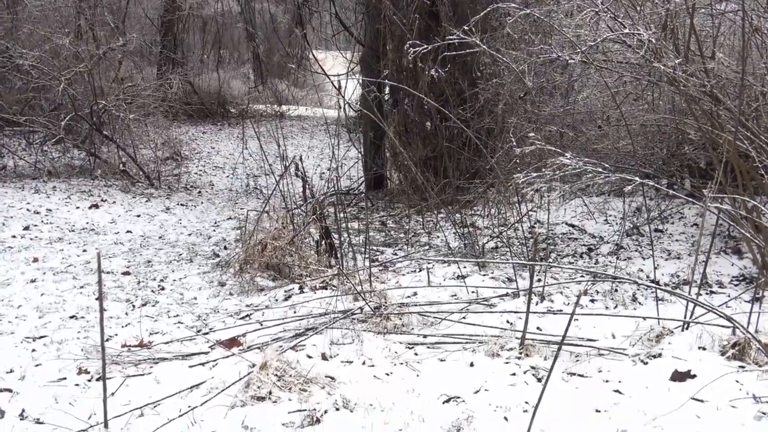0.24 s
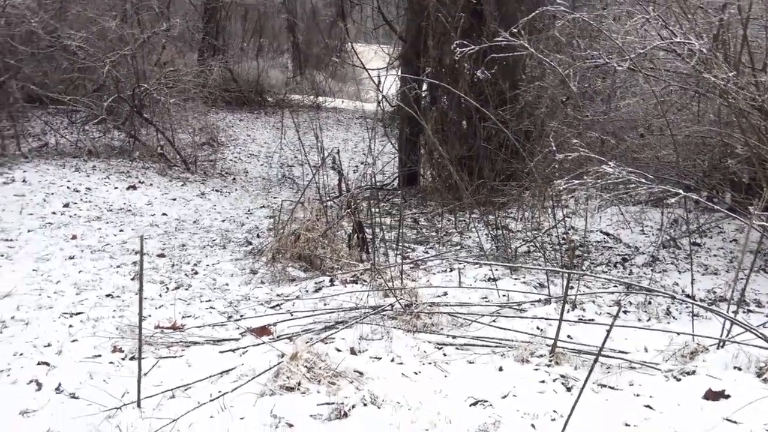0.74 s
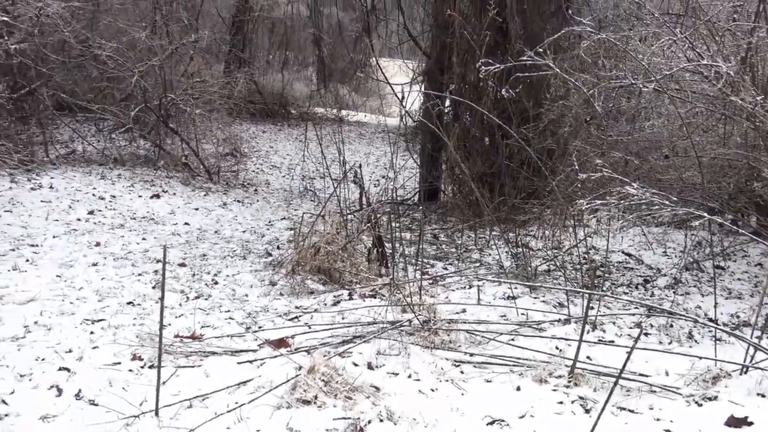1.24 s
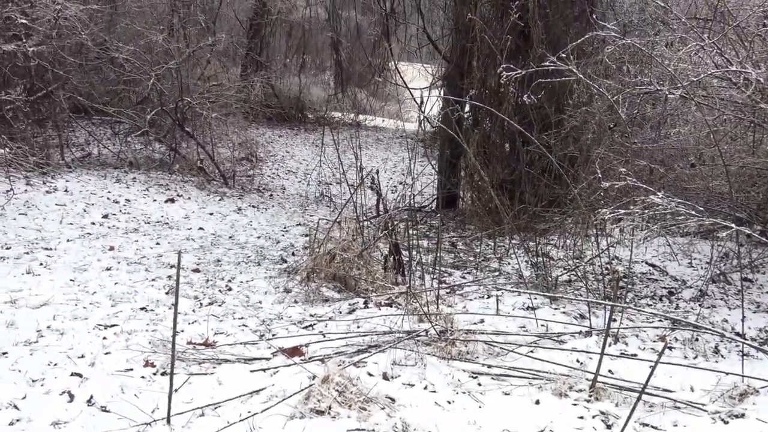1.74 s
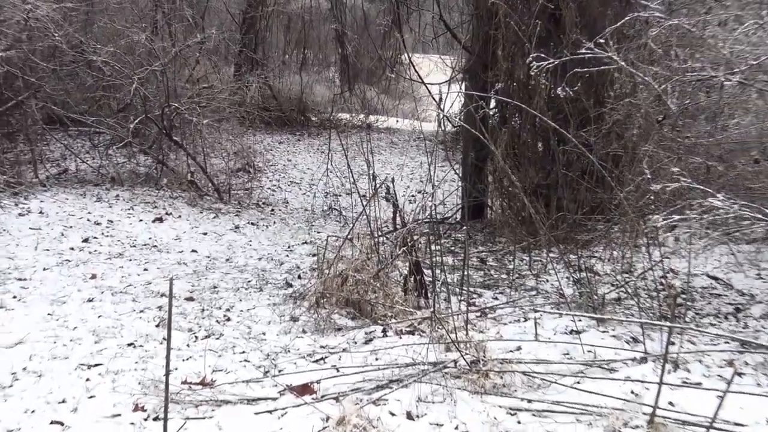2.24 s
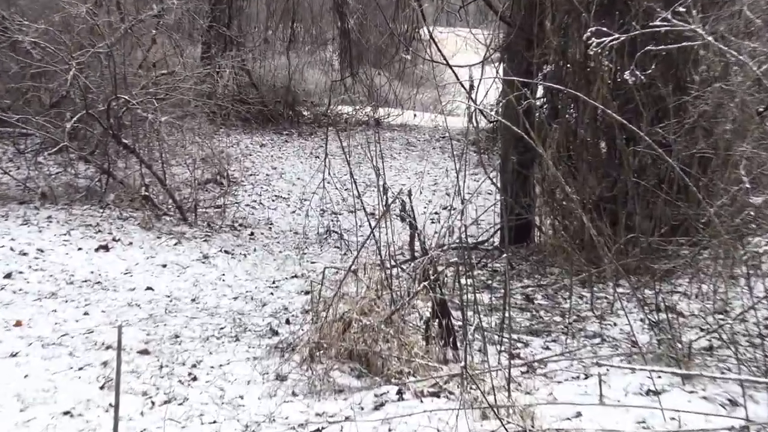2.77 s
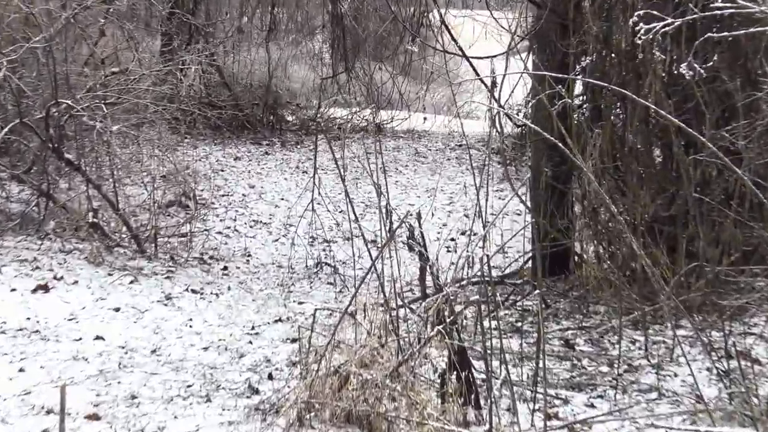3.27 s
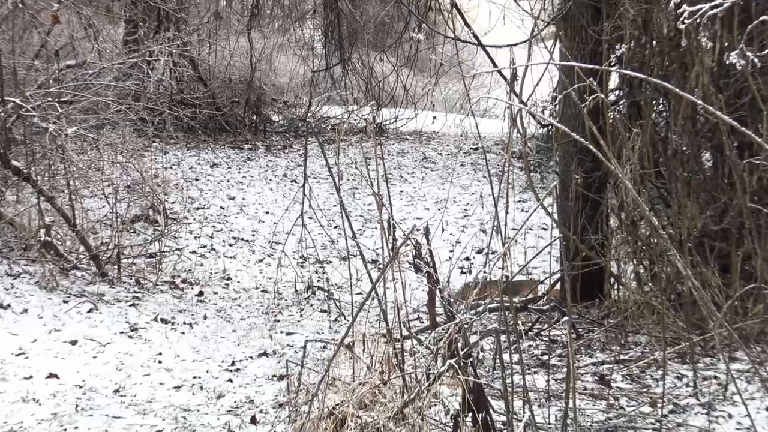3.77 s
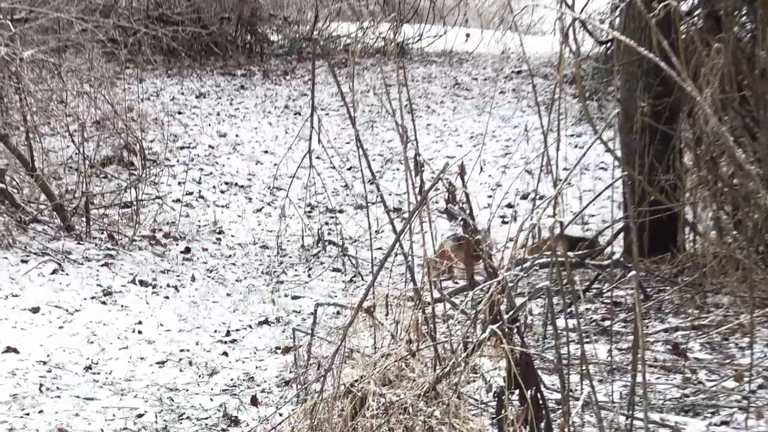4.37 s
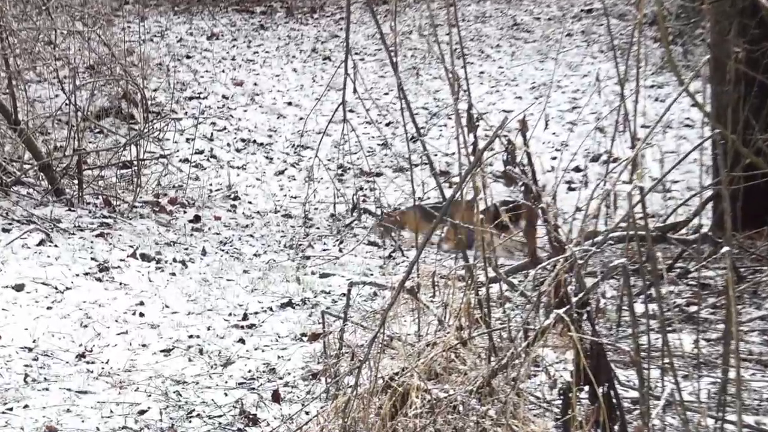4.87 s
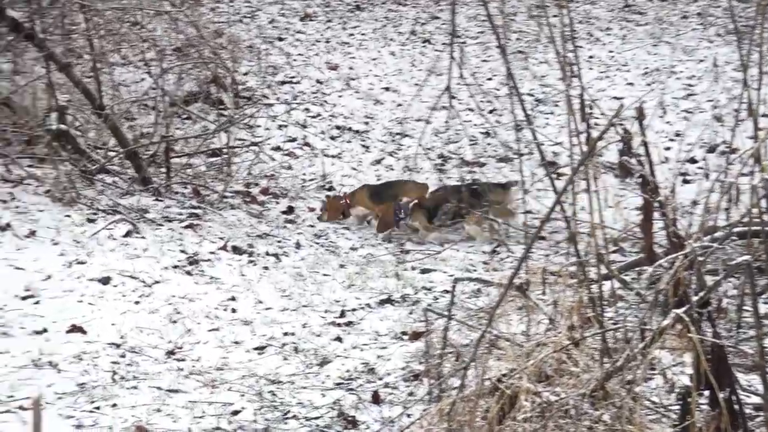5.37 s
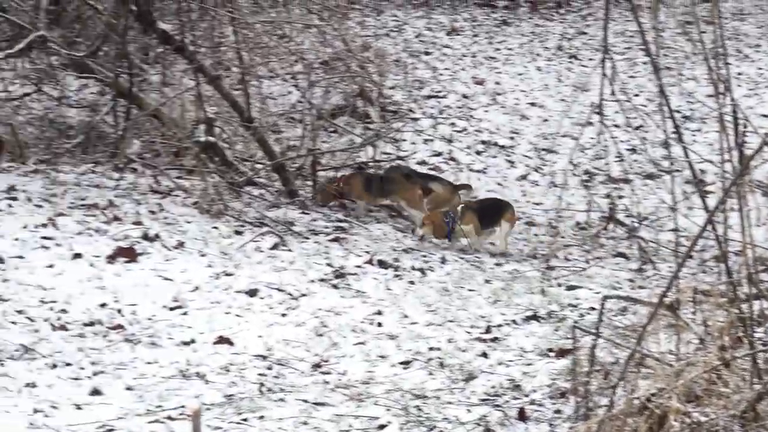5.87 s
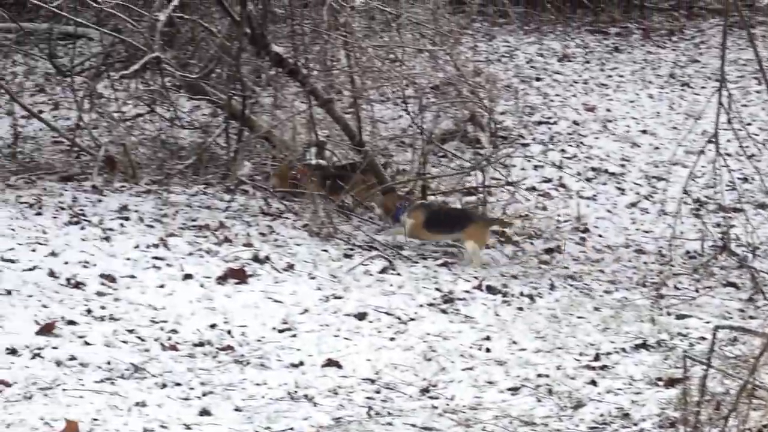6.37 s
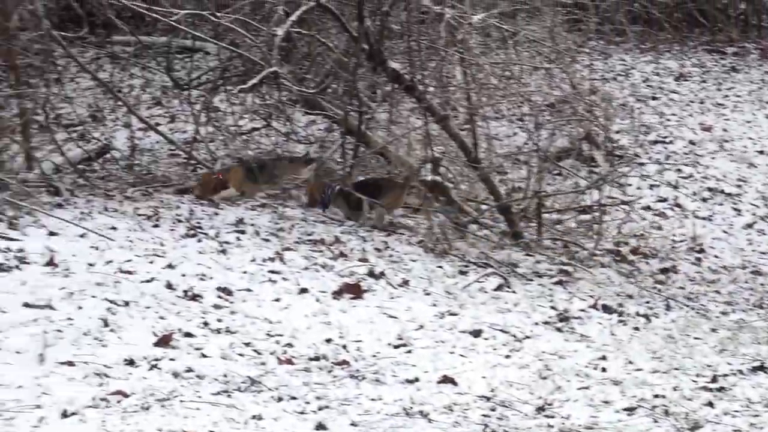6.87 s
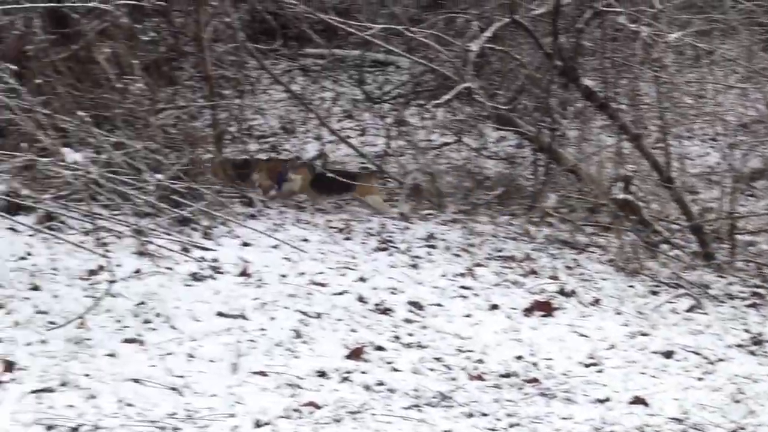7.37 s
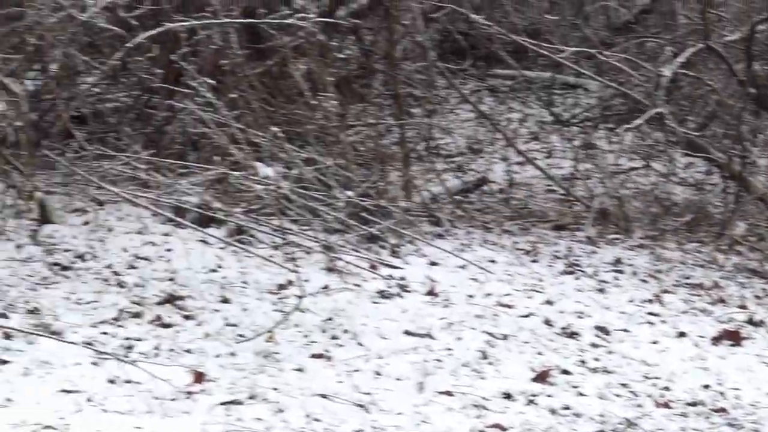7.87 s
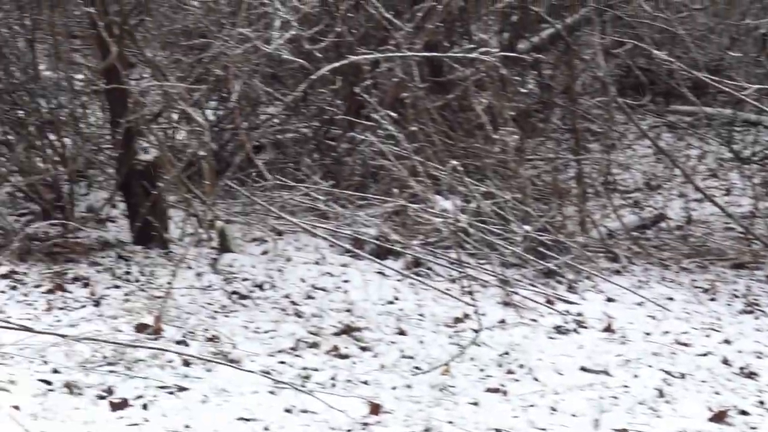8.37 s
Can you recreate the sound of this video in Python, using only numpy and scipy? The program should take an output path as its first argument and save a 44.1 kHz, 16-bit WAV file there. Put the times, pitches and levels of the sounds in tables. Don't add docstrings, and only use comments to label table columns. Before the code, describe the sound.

A pack of three hounds is baying from the first instant and keeps going to the end, about 8.6 seconds, over a low steady hum of far traffic and air. Cries last roughly 0.1 to 0.25 seconds and overlap: clear held notes, slides falling from brief squeaks, and thin yips cracking into hoarse lower bays. Dry twigs tick close by within the first 0.6 seconds, while a faint rising whine sounds farther off at 0.5. A soft paw thud comes near 1.8, a sharp twig snap at 3.4. From about 3.7 the cries gain fine breathy hiss as the dogs cross open ground, with loud bays around 5.2 to 6.2 and soft footfalls at 5, 6.2, 7.6 and 8.1. They are brightest near 7.2, then dull among trees, still crying. Short trunk echoes follow throughout; the dogs stay slightly right.

```python
import sys
import numpy as np
from scipy import signal
from scipy.fft import rfft, irfft, next_fast_len
from scipy.io import wavfile
from scipy.ndimage import uniform_filter1d, minimum_filter1d, map_coordinates

SR = 44100
rng = np.random.default_rng(int(sys.argv[2]) if len(sys.argv) > 2 else 0)


def persist_wave(psi):
    counts = np.round(np.clip(psi, -1, 1) * 32767).astype(np.int16)
    wavfile.write(sys.argv[1], SR, np.atleast_2d(counts).T)


def voltage_ratio(level):
    return 10 ** (np.asarray(level, float) / 20)


N = 380583

PEAK_AT = 0.402


def unit(x):
    return x / np.sqrt(np.mean(x ** 2) + 1e-20)


def along(points, hz):
    f, v = np.transpose(points)
    return np.interp(np.log(hz + 1), np.log(f + 1), v)


def wobble(count, rate):
    knots = rng.standard_normal(400)
    return map_coordinates(knots, [np.arange(count) * rate / SR], mode="wrap")


def filtered(x, response):
    m = next_fast_len(x.shape[-1] + 8192)
    hz = np.fft.rfftfreq(m, 1 / SR)
    return irfft(rfft(x, m) * response(hz), m)[..., :x.shape[-1]]


def patchy(channels, depth_db, order, size):
    z = signal.stft(rng.standard_normal((channels, N + SR)), nperseg=1024)[2]
    field = uniform_filter1d(rng.standard_normal(z.shape[1:]), order, 0)
    field = uniform_filter1d(field, size, 1)
    return signal.istft(z * voltage_ratio(depth_db * unit(field)), nperseg=1024)[1][:, :N]


def add(track, s, x):
    i = round(s * SR)
    x = x[max(-i, 0):N - i]
    track[max(i, 0):][:len(x)] += x


def held_cries(rows, bend, swell, rasp):
    third_follows = 0.36
    cries, rasps_db = [], []
    for s, length, hz, db, mouth_db in rows:
        opened_db, closed_db = max(mouth_db, 0), min(mouth_db, 0)
        mouth = [-opened_db, closed_db, third_follows * closed_db]
        cries.append([(s + u * length, hz * ratio, *(db + np.add(partials, mouth)))
                      for u, ratio, partials in zip((0, PEAK_AT, 1), bend, swell)])
        rasps_db.append(rasp[0] - rasp[1] * (db + 20))
    return np.array(cries), rasps_db


def slid_cries(rows, swell, rasp):
    early = 0.764
    cries, rasps_db = [], []
    for s, length, from_hz, to_hz, db in rows:
        cries.append([(s + u * length, from_hz + u ** early * (to_hz - from_hz), *np.add(db, partials))
                      for u, partials in zip((0, PEAK_AT, 1), swell)])
        rasps_db.append(rasp[0] - rasp[1] * (db + 20))
    return np.array(cries), rasps_db


def hound(cries, rasps_db, attack, release, jitter, flutter_db, halves_db, blur_db, air_db, upper_db):
    tone, breath = np.zeros(N), np.zeros(N)
    for cry, rasp_db in zip(cries, rasps_db):
        s, hz, *levels = cry.T
        t = np.arange(s[0] - attack, s[-1] + release, 1 / SR)
        n, since = len(t), t - t[0]
        shape = np.clip(since / attack, 0, 1) * np.clip((t[-1] - t) / release, 0, 1)
        scoop = 1 - 0.0503 * np.exp(-since / 0.0144)
        glide = uniform_filter1d(np.interp(t, s, hz), size=900)
        pitch = glide * scoop * (1 + jitter * wobble(n, rate=122.2))
        phase = 2 * np.pi * np.cumsum(pitch) / SR
        stack = [np.interp(t, s, db) for db in levels]
        top_db = np.max(stack, axis=0)
        upper_base_db = (top_db + stack[2]) / 2 + upper_db
        for k in range(4, 7):
            stack.append(upper_base_db - np.minimum(9 * ((k * pitch - 2550) / 330) ** 2, 24))
        blur = min(voltage_ratio(rasp_db + blur_db), .5)
        x = np.zeros(n)
        for k, db in enumerate(stack, 1):
            level = voltage_ratio(db + flutter_db * wobble(n, rate=35.7))
            x += level * (1 + blur * wobble(n, rate=175.1)) * np.sin(k * phase)
        x = x * (1 + voltage_ratio(halves_db + 3 * wobble(n, rate=9)) * np.sin(phase / 2))
        add(tone, t[0], np.sqrt(2) * shape * x)
        burst = shape * (1 + 2.4 * np.exp(-since / 0.03))
        gate = 1 + .7 * np.sin(phase)
        add(breath, t[0], burst * voltage_ratio(top_db + rasp_db + air_db) * gate)
    return np.array([tone, breath])



def clear_notes():
    clear_cries = [(.015, 0.19, 587, -23, -1), (1.145, 0.17, 625.5, -18, 10.5),
                   (1.575, 0.22, 578.5, -18.5, 2), (1.755, 0.092, 607.4, -14.5, -9.5),
                   (2.005, 0.13, 581, -20.5, 1), (2.435, 0.171, 601.6, -21, 2), (2.955, .08, 601, -26, 3),
                   (3.815, 0.1465, 597.7, -19.5, 9.5), (4.545, 0.15, 593, -15.5, -5.5),
                   (4.975, 0.14, 594.3, -18, -6), (6.365, 0.12, 593.2, -16, 8),
                   (6.945, 0.13, 608.7, -20, 1.5), (7.965, 0.137, 598.3, -16, 1.5),
                   (8.345, 0.212, 610.8, -20.5, 5)]
    clear_swell = [(-6, -1.5, -9), (1, -0.5, -10), (-9, -9, -26.5)]
    cries = held_cries(clear_cries, bend=(.965, 1.003, 1.015), swell=clear_swell, rasp=(-26, .4))
    return hound(*cries, attack=.03, release=0.041, jitter=0.013, flutter_db=3.26,
                 halves_db=-16.5, blur_db=12, air_db=14, upper_db=-7.0)


def early_closed_notes():
    closing_cries = [
        (.585, 0.083, 596, -14, -11),
        (3.075, 0.12, 616.5, -18.5, -6.5),
        (3.325, 0.12, 581.6, -20, -9.5),
        (5.285, 0.092, 633, -10.5, -7),
        (5.755, .11, 609.5, -13, -5.5),
        (6.185, .13, 615.5, -22.5, -0.5),
        (6.715, .13, 583.5, -15.5, 6),
        (7.135, 0.083, 629, -16.5, -5),
        (7.465, 0.11, 621.2, -15.5, -0.5),
    ]
    closing_swell = [(-1.5, 0, -10), (-1.5, -1, -12), (-5, -6, -18.5)]
    cries = held_cries(closing_cries, bend=(1.01, 1.003, 0.97), swell=closing_swell, rasp=(-26, .4))
    return hound(*cries, attack=.022, release=0.022, jitter=0.0089, flutter_db=3.0,
                 halves_db=-17, blur_db=18, air_db=14, upper_db=-11)


def falling_slides():
    falls = [
        (.14, 0.13, 656.5, 620.6, -23),
        (2.152, 0.041, 668, 590, -15),
        (2.63, .14, 671, 561, -16),
        (3.53, 0.095, 615.5, 570, -14.5),
        (4.13, 0.085, 687.5, 632.4, -27),
        (6.14, 0.0453, 669.4, 582, -11),
    ]
    fall_swell = [(-17, -3, -13), (-9, -1, -8), (-14.5, -10, -15.5)]
    cries = slid_cries(falls, swell=fall_swell, rasp=(-26, .2))
    return hound(*cries, attack=.008, release=0.031, jitter=0.017, flutter_db=4.5,
                 halves_db=-17, blur_db=10, air_db=10, upper_db=-4)


def dark_slides():
    slides = [(.16, 0.037, 684, 669, -12), (.215, 0.056, 644, 606, -15), (.415, .14, 848, 718, -23),
              (1.25, 0.042, 647, 629, -7), (1.66, 0.11, 899, 776, -25), (2.205, 0.04, 687, 593.3, -10.5),
              (3.39, 0.075, 719, 709.4, -16), (4.15, 0.1105, 688, 575, -13),
              (5.622, 0.019, 790, 650, -27.5), (6.695, 0.039, 743, 786, -19.5),
              (8.315, 0.027, 657, 748, -23), (8.425, 0.12, 825, 716, -16.5)]
    slide_swell = [(-5.5, -13.5, -21), (2, -19, -17), (-11, -16, -71)]
    cries = slid_cries(slides, swell=slide_swell, rasp=(-26, .2))
    return hound(*cries, attack=0.022, release=0.019, jitter=0.016, flutter_db=6.5,
                 halves_db=-17, blur_db=10, air_db=10, upper_db=-17)


def hoarse_bays():
    hoarse_cries = [(.015, 0.051, 513, -23, 4.5), (.425, .11, 521.6, -28, 6.5), (.8, .12, 530.6, -27, 2.5),
                    (2.125, 0.15, 523.3, -23, 1.5), (2.515, 0.15, 550, -19.5, 6.5),
                    (2.965, 0.09, 508, -23, 3), (3.655, 0.081, 511.7, -26.5, -1.5),
                    (4.795, 0.099, 494.3, -22, -4.5), (6.04, 0.093, 532.3, -17, -2),
                    (7.045, 0.084, 512, -22, 4.5), (7.405, 0.16, 494, -27.5, 2.5),
                    (7.895, 0.076, 516, -22.5, 7.5), (8.415, 0.071, 510, -21.5, 19)]
    hoarse_swell = [(-3, 0.89, -4.5), (0.5, 0.66, -17.5), (-7.5, -3.4, -14)]
    cries = held_cries(hoarse_cries, bend=(1.02, 1.003, 0.94), swell=hoarse_swell, rasp=(-20, 1.2))
    return hound(*cries, attack=.015, release=0.019, jitter=0.018, flutter_db=3.5,
                 halves_db=-3.5, blur_db=1.5, air_db=7.5, upper_db=-18)


def arched_bays():
    arched_cries = [
        (1.265, 0.075, 530, -19, 10.5),
        (4.135, 0.067, 519.7, -20, 4.5),
        (4.39, 0.08, 501, -22.5, 13),
        (5.19, 0.077, 521, -14.5, -5.5),
        (5.515, 0.077, 523.4, -18, -10),
        (6.6, 0.088, 525.3, -15.5, 13),
    ]
    arched_swell = [(-1, -4.5, -7.5), (4.5, 4, -16), (-5, -2.5, -28.5)]
    cries = held_cries(arched_cries, bend=(0.94, 1.005, 1.003), swell=arched_swell, rasp=(-27, .8))
    return hound(*cries, attack=.015, release=0.024, jitter=0.0076, flutter_db=5.0,
                 halves_db=-16, blur_db=11.5, air_db=7.5, upper_db=-17)


def yips():
    # centre t/s, pitch f/Hz, level/dB, partials 2 and 3 under it/dB
    cracks = [(.399, 881, -21, -43, -35.5), (.579, 791, -17, -28, -8.5), (.789, 823, -24.5, -3, -21),
              (1.239, 863, -14.5, -11, -12.5), (1.639, 885, -14.5, -26, -24), (2.104, 858, -19, -14, -38),
              (2.489, 849, -18.5, -11, -25), (2.939, 812, -22.5, -9.5, -10), (3.324, 753, -25.6, -5, -12),
              (3.629, 755, -17, -8, -22), (4.111, 830, -12, -22, -36), (4.367, 767, -13, -7.5, -15.5),
              (4.494, 760, -20.5, -21, -43), (4.772, 815.4, -12, -13, -8.5), (5.169, 787, -12, -12.5, -21),
              (5.492, 731.6, -7, -35, -18), (6.017, 804, -11, -25, -14.5), (6.577, 817, -18.5, -12, -4),
              (7.024, 905, -14.5, -16, -26), (7.38, 867, -11.5, -8, -20), (7.874, 819, -14, -16, -25),
              (8.389, 906, -18, -26, -21)]
    out, t = np.zeros(N), np.arange(0, .17, 1 / SR)
    rise = np.clip(t / 0.011, 0, 1)
    sag = np.where(t < .028, 1, voltage_ratio(-13.5 - 60 * (t - .028) / 1.7))
    shape = uniform_filter1d(rise * sag * np.clip((t[-1] - t) / 0.044, 0, 1), size=200)
    for s, hz, level_db, second_db, third_db in cracks:
        upper_db = third_db - 21
        levels = np.add(level_db, [0, second_db, third_db, upper_db, upper_db])
        pitch = hz * (1.015 - 1.0 * t) * (1 + 0.14 * t * wobble(len(t), rate=59))
        phase = 2 * np.pi * np.cumsum(pitch) / SR
        flutter = voltage_ratio(40 * t * wobble(len(t), rate=50))
        x = sum(voltage_ratio(db) * shape ** (1 + k / 2) * np.sin((k + 1) * phase) for k, db in enumerate(levels))
        add(out, s - .017, np.sqrt(2) * flutter * x)
    return out


def squeaks():
    high_catches = [
        (2.132, 1200, -36, 13.5),
        (2.604, 1226, -25.5, -8),
        (3.503, 1234, -25, -9.5),
        (5.26, 1213, -40.5, 9),
        (6.127, 1106, -32, 10.5),
        (7.434, 1147, -23, -10),
    ]
    out, t = np.zeros(N), np.arange(0, 0.028, 1 / SR)
    u = t / t[-1]
    shape = np.sqrt(np.abs(np.sin(np.pi * u ** 1.46)))
    scoop = 1 + 0.177 * (1 - (1 - u) ** 2)
    for s, hz, db, octave_db in high_catches:
        phase = 2 * np.pi * np.cumsum(hz * scoop) / SR
        add(out, s, voltage_ratio(db + 10) * shape * (np.sin(phase) + voltage_ratio(octave_db) * np.sin(2 * phase)))
    return out


def moan():
    whine = (.5, 0.19, 327, 420.5, -39)
    s, length, from_hz, to_hz, db = whine
    out, u = np.zeros(N), np.linspace(0, 1, round(length * SR))
    pitch = (from_hz + (to_hz - from_hz) * u) * (1 + .01 * wobble(len(u), rate=40))
    shape = np.sqrt(np.abs(np.sin(np.pi * u)))
    add(out, s, voltage_ratio(db + 2) * shape * np.sin(2 * np.pi * np.cumsum(pitch) / SR))
    return out


def throat(f):
    formants = [(753, 66, 9.5), (1110, 125, 5), (1920, 690, -0.5), (2285, 450, -20.5)]
    peaks = 0
    for k, (centre, width, db) in enumerate(formants):
        damping = 1j * f * width
        peaks = peaks + (-1) ** k * voltage_ratio(db) * damping / (centre * centre - f * f + damping)
    return peaks / (1 + (470 / (f + 1)) ** 12) / (1 + (f / 2900) ** 9)


def throat_rasp(breath):
    noise = patchy(channels=1, depth_db=6, order=2, size=5)[0]
    return filtered(breath * noise, throat) * voltage_ratio(7.5)


def teeth_hiss(tone, breath, near_db):
    # f/Hz, level/dB
    hiss_spectrum = [(2700, -5), (4700, 2), (6500, 1), (9800, -8.5), (12000, -29), (15500, -46)]
    effort = signal.lfilter([.0015], [1, -.9985], np.abs(tone) ** .7)
    gust = signal.lfilter([.003], [1, -.997], np.abs(breath) ** .7)
    noise = patchy(channels=1, depth_db=4.0, order=14, size=5)[0]
    hiss = unit(filtered(noise, lambda hz: voltage_ratio(along(hiss_spectrum, hz))))
    top = filtered(hiss, lambda hz: np.exp(-((hz - 13000) / 900) ** 2)) * voltage_ratio(near_db)
    return (effort * hiss + gust * (0.36 * hiss + 2.5 * top)) * voltage_ratio(-30)


def pack():
    # t/s, gain of the finest hiss/dB
    nearness = [
        (0, 0),
        (3.2, 3.5),
        (3.7, 18),
        (5.3, 21),
        (7.201, 27),
        (8.6, 8.5),
    ]
    tone, breath = (clear_notes() + early_closed_notes() + falling_slides() + dark_slides()
                    + hoarse_bays() + arched_bays())
    near_db = np.interp(np.arange(N) / SR, *np.transpose(nearness))
    chest = filtered(tone, lambda hz: 1 / (1 + (230 / (hz + 1)) ** 8)) * voltage_ratio(-34 + 0.78 * near_db)
    tone = filtered(tone, lambda hz: 1 / (1 + (450 / (hz + 1)) ** 12))
    tone = tone + chest + yips() + squeaks() + moan()
    return tone + throat_rasp(breath) + teeth_hiss(tone, breath, near_db)


def trees(x):
    # f/Hz, decay by 60 dB t/s
    decay = [(500, 0.67), (2000, 0.75), (9000, 0.1)]
    out, step = np.zeros((2, N + 2 * SR)), SR // 4
    for i in range(0, N, step):
        hz, t, z = signal.stft(rng.standard_normal((2, SR // 2 + SR // 5)), SR, nperseg=256)
        fade = voltage_ratio(-60 * t / along(decay, hz)[:, None]) * np.clip(t / 0.0043, 0, 1)
        tail = signal.istft(z * fade, SR, nperseg=256)[1]
        mid, side = tail / np.linalg.norm(tail[0])
        pair = np.array([mid + 0.036 * side, mid - 0.099 * side])
        wet = signal.fftconvolve(x[None, i:i + step], pair, axes=1)
        out[:, i:i + wet.shape[1]] += wet
    return out[:, :N]


def twigs():
    # t/s, peak level/dB
    snaps = [
        (0.0762, -17),
        (0.1067, -16),
        (0.2004, -20),
        (0.3157, -16),
        (0.5751, -15),
        (1.6412, -26),
        (3.4251, -9),
        (3.4315, -17),
    ]
    out, t = np.zeros(N), np.arange(0, .01, 1 / SR)
    for s, db in snaps:
        add(out, s, voltage_ratio(db + 6 - 60 * t / .003) * rng.standard_normal(len(t)))
    return filtered(out, lambda hz: 1 / (1 + (1800 / (hz + 1)) ** 2) / (1 + (hz / 7500) ** 3))


def paws():
    # t/s, peak level/dB
    footfalls = [
        (1.819, -32),
        (4.971, -29),
        (6.202, -24),
        (7.585, -29.5),
        (8.081, -31.5),
    ]
    out, t = np.zeros(N), np.arange(0, .12, 1 / SR)
    for (s, db), hz in zip(footfalls, rng.uniform(110, 225, len(footfalls))):
        envelope = voltage_ratio(db + 10.5 - 60 * t / 0.044) * (1 - np.exp(-t / 0.0043))
        add(out, s, envelope * np.sin(2 * np.pi * hz * t * (1 - 3.4 * t)))
    return out


def air():
    # f/Hz, level/dB per Hz
    hum_spectrum = [(15, -50), (30, -9), (65, -4), (160, -2.5), (260, -9), (3000, -20), (7700, -24),
                    (15500, -37)]
    # f/Hz, left-right likeness/1
    likeness = [(200, 0.94), (3000, 1), (9000, 0.36)]

    def mid_side_gains(hz):
        angle = np.arccos(np.clip(along(likeness, hz), -1, 1)) / 2
        return voltage_ratio(along(hum_spectrum, hz)) * [np.cos(angle), np.sin(angle)]

    mid, side = filtered(patchy(channels=2, depth_db=5.0, order=4, size=6), mid_side_gains)
    return voltage_ratio(-43.5) * unit(np.array([mid + side, mid - side])) * voltage_ratio([[.8], [-.8]])


def scene():
    # t/s, left minus right level/dB
    drift = [(0, -2.5), (8.603, -1.7)]
    dogs = pack()
    pan_db = np.interp(np.arange(N) / SR, *np.transpose(drift))
    field = (voltage_ratio(0.5) * dogs + voltage_ratio(-11) * trees(dogs)) * voltage_ratio([pan_db / 2, -pan_db / 2])
    return field + twigs() * voltage_ratio([[1.5], [-1.5]]) + paws() + air()


def band_limit(x):
    return signal.sosfilt(signal.butter(12, 15710, fs=SR, output="sos"), x)


def record(dry):
    need = np.minimum(1, .87 / (np.abs(dry).max(axis=0) + 1e-9))
    held = dry * uniform_filter1d(minimum_filter1d(need, size=900), size=800)
    note = uniform_filter1d(np.abs(held[1]), size=1024)
    for edge_hz, limit in ((13900, .085), (10600, .22)):
        dulled = uniform_filter1d(1. * (note > limit), size=512)
        held = held - dulled * filtered(held, lambda hz: hz > edge_hz)
    return band_limit(held)


dry = scene()
out = record(dry)
persist_wave(out)
```